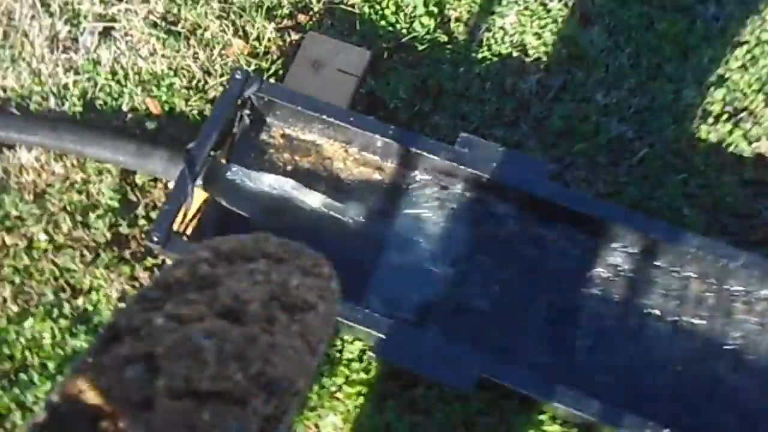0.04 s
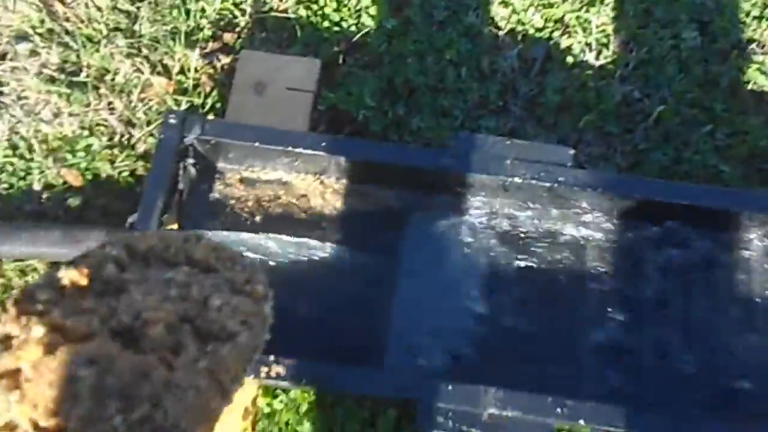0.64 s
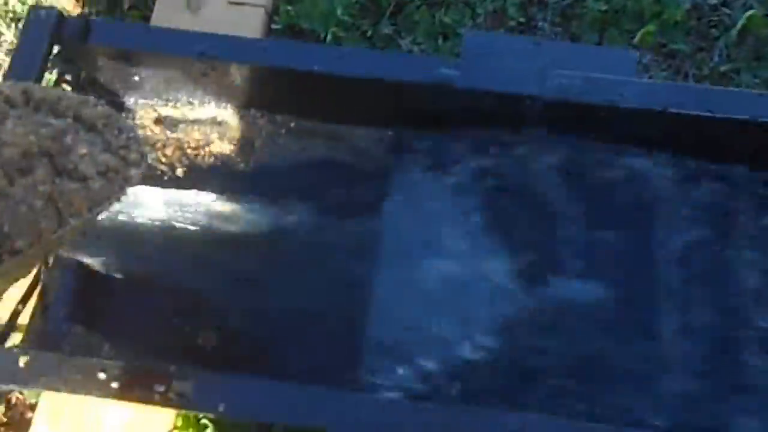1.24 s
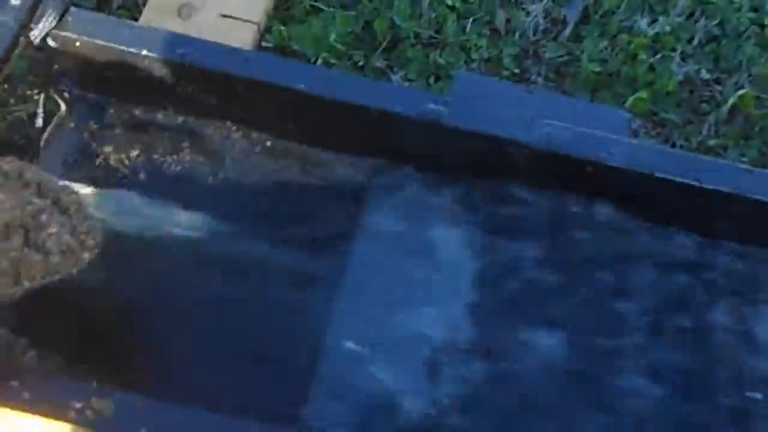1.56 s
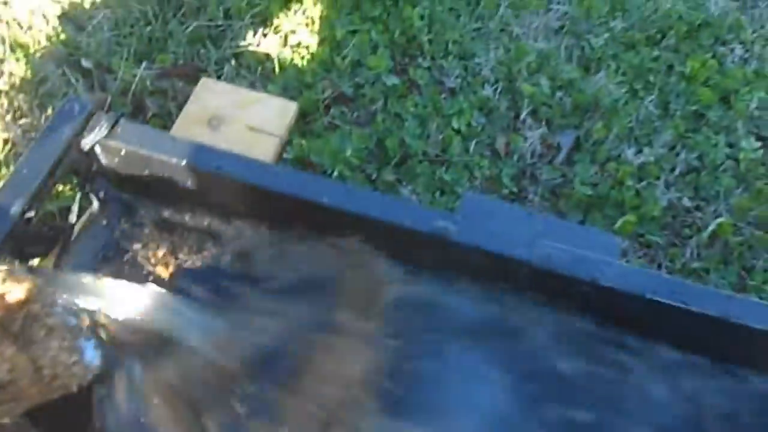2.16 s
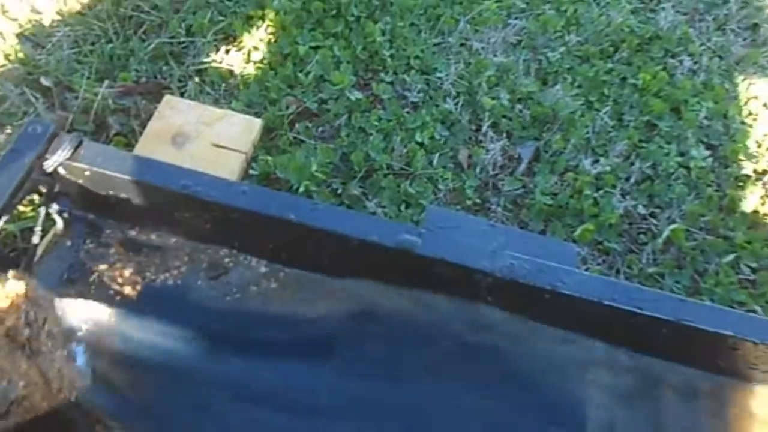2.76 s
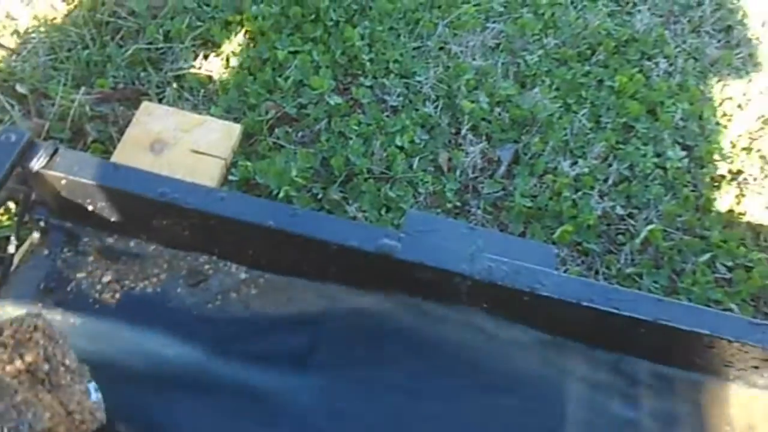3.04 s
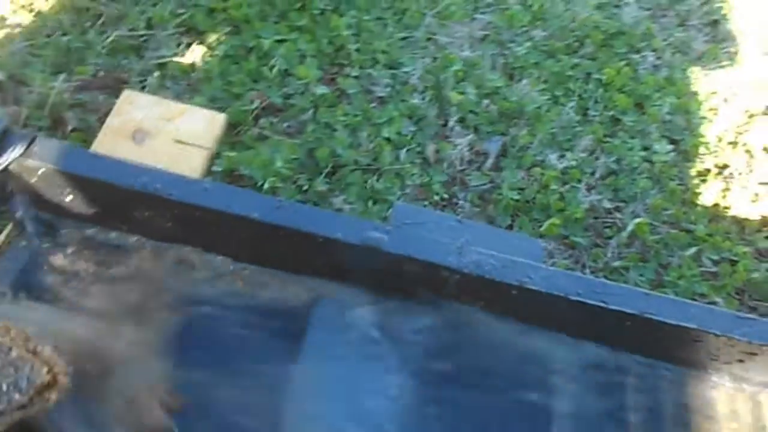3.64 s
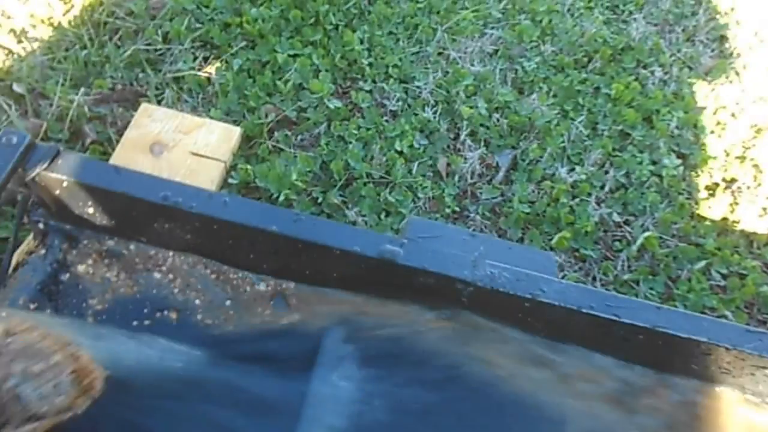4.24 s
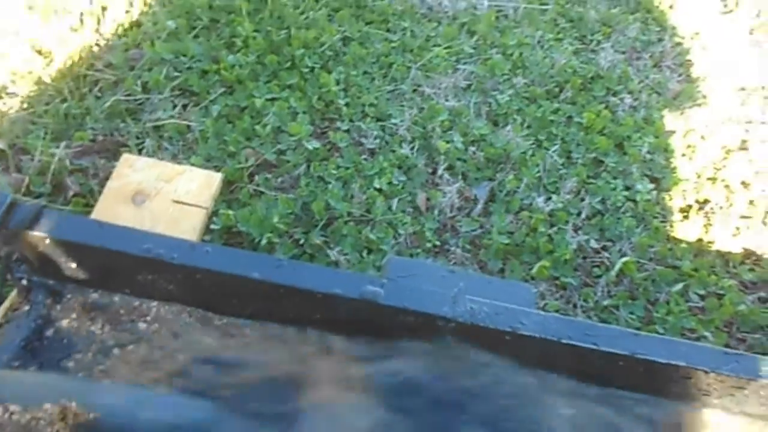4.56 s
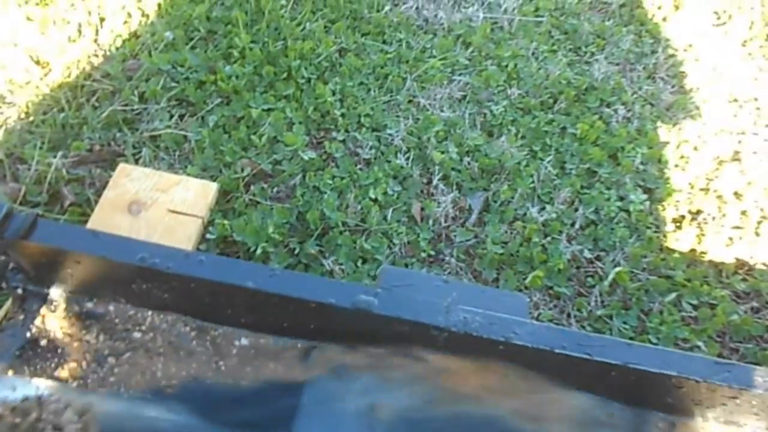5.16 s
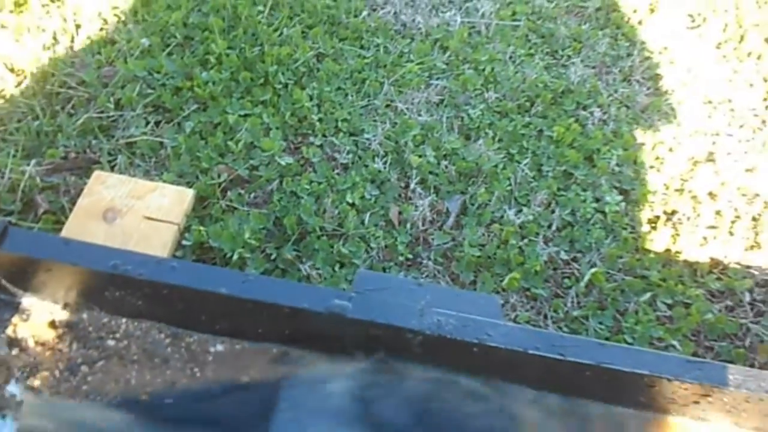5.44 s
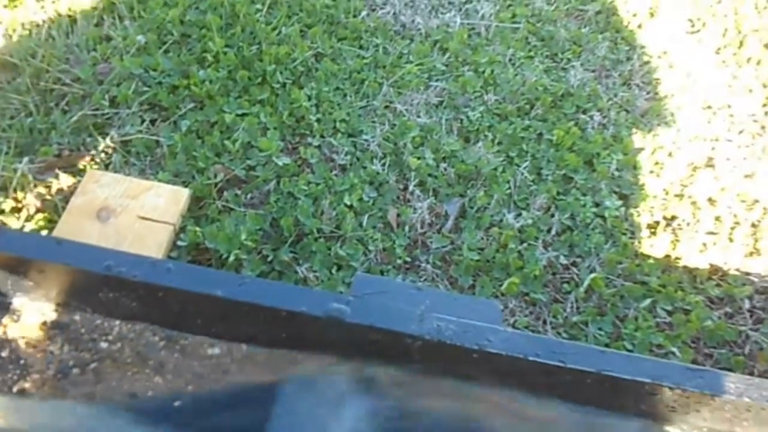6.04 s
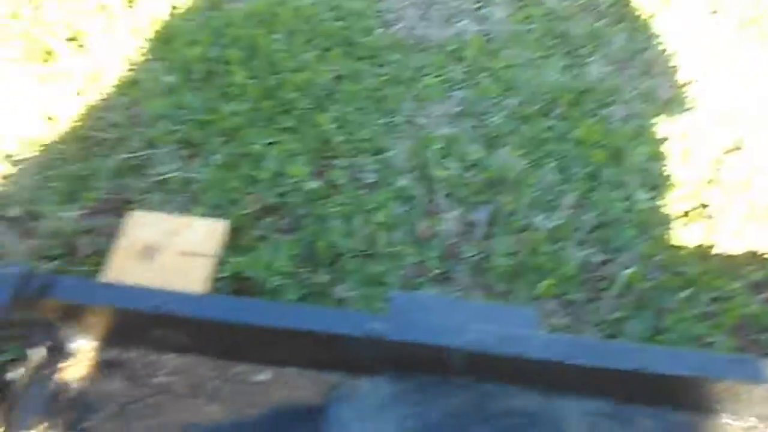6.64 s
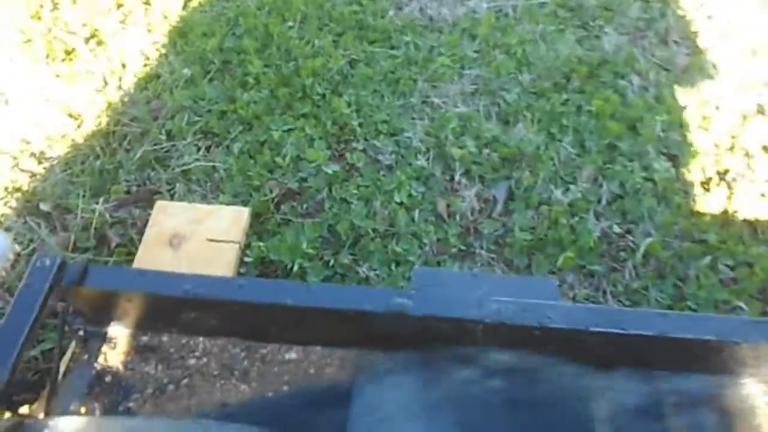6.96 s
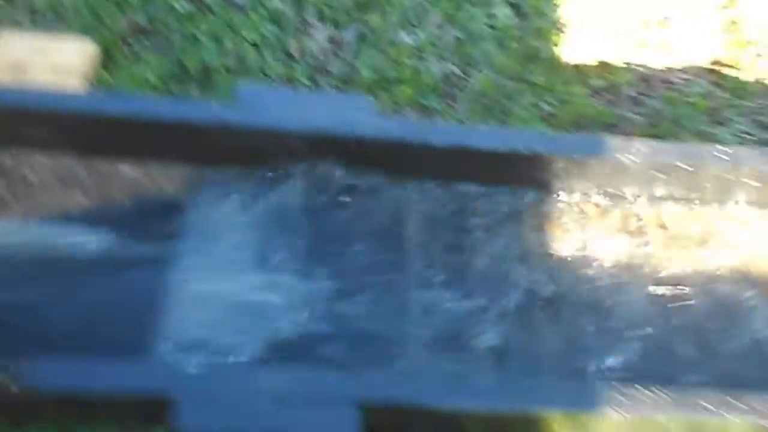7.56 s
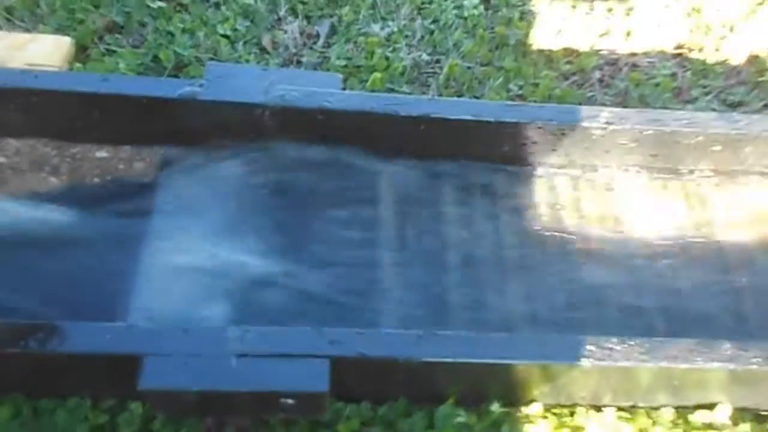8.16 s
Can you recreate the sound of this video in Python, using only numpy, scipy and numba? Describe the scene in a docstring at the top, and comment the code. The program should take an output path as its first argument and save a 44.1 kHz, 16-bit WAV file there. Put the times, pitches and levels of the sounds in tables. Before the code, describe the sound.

Close running water bubbles and crackles in a trough as wet gravel drops in, plopping, rattling and washing away.

```python
"""Hose jet in a sluice box

A hose jet runs down a sluice box on a lawn. Where it plunges it traps gulping pockets of air, sheds
rising bubbles and throws up a fine crackling spray. Clods of wet gravel drop off a scoop, choke the jet
for a while and are washed down the trough. A pump hums faintly and a breeze touches the microphone."""
import sys
import numpy as np
from scipy import signal
from scipy.fft import rfft, irfft
from scipy.io import wavfile
from scipy.ndimage import uniform_filter1d
from numba import njit

SR = 44100
rng = np.random.default_rng(int(sys.argv[2]) if len(sys.argv) > 2 else 0)


def master(y):
    """Save y as 16-bit WAV."""
    cut = np.clip(np.atleast_2d(y).T, -1, 1)
    pcm = np.round(cut * 32767)  # scale
    wavfile.write(sys.argv[1], SR, pcm.astype(np.int16))


N = 366471
TIME = np.arange(N) / SR

# large air pockets trapped by the jet: (time [s], level [dB], pitch [Hz])
AIR_POCKETS = [(.141, -2, 673), (.287, -5.5, 645), (.445, -6.5, 610), (.541, -6, 682), (.951, 1.5, 697),
               (1.62, -8, 638), (1.9, -7.5, 680), (1.929, -1.5, 653), (2.541, -9.5, 635),
               (5.129, -10.5, 687), (5.262, -9, 700), (5.295, -13.5, 680), (6.03, -6.5, 692),
               (6.375, -5, 686), (6.534, -4.5, 638), (6.689, -8.5, 660), (7.212, -4.5, 714),
               (7.656, -5, 640), (7.913, -11, 647)]
# bright tone of droplets and fine grit: (frequency [Hz], level [dB])
SPRAY_EQ = [(300, -33), (900, -6.5), (2200, -4.5), (4000, -11), (5800, -14), (7000, -9.5), (8500, -3),
            (10300, 7), (11000, 2.5), (13000, -12)]


def undb(db):
    """Decibels to gain."""
    return 10 ** (np.asarray(db) / 20)


def unit(x):
    """Scale to rms 1."""
    return x / np.sqrt(np.mean(x ** 2))


def wander(rate):
    """Smooth random drift, a new value every 1 / rate s; spread near 1."""
    hold = int(SR / rate)
    steps = np.repeat(rng.standard_normal(N // hold + 1), hold)
    return 1.39 * uniform_filter1d(uniform_filter1d(steps, hold), hold)[:N]


def colour(x, points, size=4096):
    """Minimum-phase EQ of unit power gain through (frequency [Hz], level [dB]) points."""
    hz, db = np.transpose(points)
    bins = np.maximum(np.arange(size // 2 + 1) * SR / size, 1)
    cepstrum = irfft(np.log(undb(np.interp(np.log(bins), np.log(hz), db))))
    cepstrum[1:size // 2] *= 2
    cepstrum[size // 2 + 1:] = 0
    response = irfft(np.exp(rfft(cepstrum)))
    return signal.fftconvolve(x, response / np.linalg.norm(response))[:N]


def patter(rate, spread_db):
    """Tiny impacts of random size, about `rate` a second; rms 1."""
    hits = rng.random(N) < rate / SR
    sizes = undb(spread_db * np.minimum(rng.exponential(size=N), 4))
    return unit(hits * sizes * rng.choice([-1, 1], N))


def bursts(rows, tail):
    """Envelope of splashes (time [s], level [dB], length [s]), each with a softer tail."""
    out = np.zeros(N + SR // 4)
    for start, db, length in rows:
        age = TIME[:SR // 4] / length
        first = int(start * SR)
        out[first:first + len(age)] += undb(db) * (np.exp(-age ** 4) + tail * np.exp(-age / 2))
    return out[:N]


def swells(rows, attack_s, release_s):
    """Envelope of events (time [s], length [s], level [dB]) that rise, hold and die away."""
    out = np.zeros(N)
    for start, length, db in rows:
        onset = np.clip((TIME - start) / attack_s, 0, 1)
        out += undb(db) * onset * np.exp(-np.maximum(TIME - start - length, 0) / release_s)
    return out


@njit
def bubbles(start, size, hz, life, rise, damping, swell):
    """Each bubble grows for `swell` cycles, rings down and climbs in pitch until it surfaces."""
    out = np.zeros(N)
    for k in range(len(start)):
        first, length, phase = int(start[k] * SR), int(life[k] * SR), 0.
        for i in range(min(length, N - first)):
            age = i / length
            phase += hz[k] * (1 + rise * (.3 * age + .7 * age ** 3)) / SR
            envelope = (1 - np.exp(-(phase / swell) ** 2)) * np.exp(-damping * age) * (1 - age ** 6)
            out[first + i] += size[k] * envelope * np.sin(2 * np.pi * phase)
    return out


def swarm(rate, centre_hz, octaves, cycles, rise, spread_db):
    """Random bubbles, `rate` a second, scattered round one pitch; rms 1."""
    when, pitch, span, heft = rng.random((int(rate * N / SR), 4)).T
    hz = centre_hz * 2 ** (octaves * np.arcsin(2 * pitch - 1) / (np.pi / 2))
    size = undb(-spread_db * np.log(np.maximum(heft, .02))) * np.sqrt(centre_hz / hz)
    life = cycles * (.5 + span) / hz
    return unit(bubbles(when * N / SR, size, hz, life, rise, damping=2.95, swell=0.72))


def flow(layer):
    """Fader for "froth" or "spray": the water drops at the first big clod and slowly recovers."""
    # strength of the running water: (time [s], froth level [dB], spray level [dB])
    water_levels = [(0, -40.5, -42), (.48, -37, -38), (.72, -44.5, -42), (1.0, -40.5, -41.5),
                    (1.35, -38, -39.5), (1.85, -35, -35), (2.02, -36.5, -40), (2.08, -45.5, -44),
                    (2.7, -42, -42), (3.2, -46, -45.5), (3.4, -47.5, -52.5), (3.62, -55, -48),
                    (3.95, -43, -43), (4.35, -45, -46.5), (5.3, -42, -40.5), (5.55, -44, -44),
                    (6.0, -40, -37.5), (6.8, -39, -40), (8.31, -40, -40)]
    times, froth_db, spray_db = np.transpose(water_levels)
    return undb(np.interp(TIME, times, {"froth": froth_db, "spray": spray_db}[layer]))


def jet_open():
    """1 while the jet plunges freely, 0 while wet gravel chokes it."""
    choked_s, cleared_s, fade_s = 2.603, 5.15, 0.085
    return np.clip(np.maximum(choked_s - TIME, TIME - cleared_s) / fade_s + 1, 0, 1)


def jet():
    """The plunging jet traps air pockets of nearly one size that gurgle and gulp, until choked."""
    gurgle = swarm(rate=190, centre_hz=677, octaves=0.21, cycles=17.7, rise=0.05, spread_db=4)
    start, db, hz = np.array(AIR_POCKETS).T.copy()
    life_s = np.full(len(start), 0.027)
    gulps = bubbles(start, undb(db), hz, life_s, rise=0.055, damping=5.8, swell=2.1)
    return gurgle * undb(8) * flow("froth") * jet_open() + gulps


def froth():
    """Bubbles chirp and ping in the churned water, over its dull slosh and a wash of tiny splashes."""
    # tones of the body of water and of the tiny splashes: (frequency [Hz], level [dB])
    slosh_eq = [(60, -31), (170, -12.5), (255, -7.5), (320, -15), (450, 6), (560, -0.5), (800, -1),
                (1200, -10.5), (1700, -51), (4000, -16)]
    wash_eq = [(500, -27), (1400, -5), (2500, 1), (4000, -4.5), (7000, -30)]
    large = swarm(rate=230, centre_hz=1089, octaves=0.52, cycles=13.9, rise=0.32, spread_db=3.5)
    small = swarm(rate=520, centre_hz=2218, octaves=0.828, cycles=16.1, rise=0.49, spread_db=5)
    pings = swarm(rate=70, centre_hz=2686, octaves=0.703, cycles=25.5, rise=0.545, spread_db=0.5)
    slosh = colour(patter(rate=970, spread_db=3.5), slosh_eq)
    wash = colour(patter(rate=3000, spread_db=3.5), wash_eq)
    churn = undb(1.36 * wander(45) + 0.44 * wander(12))  # the surface heaves, so bubbles bunch
    duck = undb(-6 + 4 * jet_open())  # a blocked jet churns in less air
    chirps = (undb(-1) * large + undb(-4) * small + undb(-4) * pings) * duck
    return undb(2) * flow("froth") * churn * (chirps + undb(-2.5) * slosh + undb(-8.5) * wash)


def spray():
    """Droplets crackle in quick flurries and the tiniest bubbles fizz; a few drops hit the box hard."""
    # sharp drops and grit striking the box: (time [s], level [dB])
    strikes = [(0.591, 3), (1.181, 1.5), (1.74, 1.5), (4.017, -2), (4.504, -0.5), (5.369, 2),
               (6.4593, -0.5), (6.8953, 0.5), (7.9158, -1)]
    crackle = patter(rate=2000, spread_db=5) + undb(-8) * rng.standard_normal(N)
    fizz = swarm(rate=1200, centre_hz=6404, octaves=0.94, cycles=23, rise=0.56, spread_db=4)
    heavy_drops = patter(rate=60, spread_db=2.5)
    flurries = undb(1.42 * wander(110) + 1.24 * wander(30))
    mist = unit(colour((crackle + undb(2) * fizz + undb(0.5) * heavy_drops) * flurries, SPRAY_EQ))
    ticks = np.zeros(N)
    for start, db in strikes:
        ticks[int(start * SR)] += undb(db)
    return undb(5) * flow("spray") * mist + colour(ticks, SPRAY_EQ)


def pump():
    """A faint pump hum, each harmonic wavering in level and pitch."""
    # partials of the hum: (frequency [Hz], relative level [dB])
    harmonics = [(86, -63), (172, -67), (258, -62)]
    hum = np.zeros(N)
    for hz, db in harmonics:
        rms = undb(db - 3 + 0.45 * wander(7.8))
        phase = np.cumsum(hz * (1 + 0.0052 * wander(6.1))) / SR
        hum += rms * np.sqrt(2) * np.sin(2 * np.pi * phase)
    return hum


def breeze():
    """A bed of still air, and a light breeze that flutters and gusts on the microphone."""
    # tones of the open air and of the wind rumble: (frequency [Hz], level [dB])
    air_eq = [(20, -14.5), (85, -2.5), (130, -0.5), (200, -10.5), (500, -1), (1500, -20.5), (10000, -42)]
    rumble_eq = [(15, -14), (50, -12.5), (90, -17.5), (200, -29), (1000, -83)]
    # gusts on the microphone: (time [s], length [s], level [dB])
    gusts = [(.3, .4, -58), (1.96, .08, -48), (6.3, 0.33, -51), (6.98, 0.62, -57.5), (8.14, 0.078, -51)]
    air = undb(-51.5) * colour(rng.standard_normal(N), air_eq)
    wind = undb(-65) + swells(gusts, attack_s=0.099, release_s=0.027)
    flutter = undb(1.8 * wander(14))
    return air + wind * flutter * colour(rng.standard_normal(N), rumble_eq)


def bloops():
    """Large single bubbles sing upward, jostled by the current; fainter strays come at random."""
    # large rising bubbles: (time [s], level [dB], starting pitch [Hz])
    big_bubbles = [(0.114, -15.5, 920), (0.467, -11, 970), (0.502, -13.5, 888), (.931, -16.5, 987),
                   (1.352, -16.5, 940), (1.418, -15, 1610), (2.624, -16, 1103), (2.768, -21, 974),
                   (2.835, -41, 1980), (3.036, -21, 1260), (3.185, -24, 1720), (3.219, -19.5, 1120),
                   (3.364, -18.5, 728), (3.701, -20.5, 720), (3.737, -20.5, 940), (4.218, -20, 1180),
                   (4.442, -22, 1015), (4.632, -17.5, 878), (6.485, -7, 813), (6.604, -16, 1920),
                   (6.704, -9, 998), (6.756, -12, 916), (6.893, -9.5, 848), (7.12, -17.5, 2080),
                   (7.793, -16.5, 1154)]
    start, db, hz = np.array(big_bubbles).T.copy()
    loud = bubbles(start, undb(db), hz, 29 / hz, rise=.8, damping=3.6, swell=1.7)
    strays = swarm(rate=11, centre_hz=1359, octaves=0.716, cycles=24.4, rise=.6, spread_db=2.7)
    jostle = undb(1.5 * wander(300))
    return (loud + undb(-4) * flow("froth") * strays) * jostle


def slaps():
    """Water folds onto itself in a short burst of droplets, alone or as it closes over a gulp."""
    # water folding over: (time [s], level [dB])
    folds = [(0.502, -31), (2.199, -25.5), (2.558, -24.5), (2.83, -32.5), (4.217, -26.5), (5.1, -27),
             (5.432, -24), (6.611, -25.5), (6.901, -25.5), (7.119, -28), (7.916, -27)]
    # tone of a wet slap: (frequency [Hz], level [dB])
    slap_eq = [(250, -16), (700, 2.5), (1300, -1), (2400, -3.5), (4000, -14), (7000, -17), (11000, -6)]
    closings = [(start, db - 24) for start, db, _ in AIR_POCKETS]
    envelope = bursts([(start, db, 0.0067) for start, db in folds + closings], tail=0.73)
    return envelope * colour(patter(rate=9200, spread_db=1), slap_eq)


def clods():
    """Each clod scatters grit, opens a cavity that plops, thuds on the trough and trails bubbles."""
    # clods hitting the water: (time [s], plop level [dB], cavity pitch [Hz], plop length [s],
    # spatter level [dB], spatter length [s], thud level [dB])
    landings = [(1.02, -1.5, 208, 0.015, -36, 0.014, -21.5), (2.017, 1, 480, 0.015, -19.5, 0.028, -23),
                (2.047, -4, 480, .016, -17.5, 0.0027, -44), (2.233, -5.5, 433, 0.015, -24.5, 0.012, -34),
                (3.109, -33, 507, .025, -24.5, 0.014, -35), (3.119, -11, 501, 0.038, -18.5, 0.019, -42),
                (3.156, -26, 483, 0.11, -24.5, .0035, -34), (3.27, -7.5, 489, 0.041, -17.5, 0.019, -33.5),
                (3.297, -17, 498, 0.04, -20, .0027, -44), (3.359, -23, 440, 0.029, -27.5, 0.005, -32),
                (3.457, -28.5, 287, 0.043, -43, 0.0099, -43), (3.586, -23.5, 485, 0.036, -27, 0.0028, -42),
                (3.615, -24, 313, 0.058, -28.5, 0.015, -31.5), (3.768, -7, 363, 0.024, -14, 0.0098, -26),
                (4.276, -24, 487, .039, -28, 0.004, -40), (4.628, -14, 387, 0.02, -25.5, .017, -33.5),
                (4.854, -16.5, 369, .036, -28, 0.015, -24.5), (4.895, -18, 365, 0.047, -24.5, 0.021, -38),
                (5.322, -8, 440, 0.023, -24, 0.0059, -26)]
    # tones of the spatter and of the thud on the trough floor: (frequency [Hz], level [dB])
    spatter_eq = [(120, -11), (300, 4.5), (900, 3), (1600, -2.5), (3200, -4.5), (5500, -6.5), (7500, -2),
                  (9600, 7.5), (11000, 6), (13000, -2)]
    thud_eq = [(50, -21), (110, -16), (160, 4.5), (200, -8), (265, 6), (400, 4), (600, -1.5), (1100, 0.5),
               (2000, -30.5), (5000, -24)]
    start, plop_db, hz, plop_s, spatter_db, spatter_s, thud_db = np.array(landings).T.copy()
    plops = bubbles(start, undb(plop_db), hz, plop_s, rise=0.053, damping=4.06, swell=1.45)
    grit = bursts(zip(start, spatter_db, spatter_s), tail=0.071) * patter(rate=9000, spread_db=6.5)
    blows = bursts([(at, db, .011) for at, db in zip(start, thud_db)], tail=0.52)
    thuds = blows * patter(rate=6000, spread_db=-2)
    trails = [(at, 0, db - 15) for at, db in zip(start, spatter_db)]
    wake = swarm(rate=260, centre_hz=626, octaves=0.82, cycles=11, rise=0.26, spread_db=6)
    wake *= swells(trails, attack_s=0.0078, release_s=0.039)
    return plops + colour(grit, spatter_eq) + colour(thuds, thud_eq) + wake


def gravel():
    """Stones tumble down the trough in surges, rattle its floor and churn up bubbles; grit clicks."""
    # resonances of the water-laden trough: (frequency [Hz], width [Hz], level [dB])
    trough_modes = [(163, 15, -5.5), (253, 75, 0), (328, 166, -2), (505, 45, 3), (732, 230, 1),
                    (854, 117, 6), (1320, 590, -10)]
    # heaps of gravel slumping into the stream: (time [s], length [s], level [dB])
    slumps = [(3.59, 0.066, -37), (3.86, .16, -35), (4.07, 0.092, -31.5), (4.27, .06, -42),
              (4.48, 0.096, -32.5), (4.61, 0.14, -31.5), (4.85, .13, -33), (5.06, 0.13, -38.5),
              (5.335, 0.06, -32.5)]
    surges = undb(2 * wander(60))
    knocks = patter(rate=400, spread_db=4.5) * surges
    stones = unit(sum((-1) ** k * undb(db) * signal.lfilter(*signal.iirpeak(hz, hz / width, SR), knocks)
                      for k, (hz, width, db) in enumerate(trough_modes)))
    glugs = swarm(rate=120, centre_hz=612, octaves=1.027, cycles=21.4, rise=0.11, spread_db=3)
    clicks = swarm(rate=90, centre_hz=7170, octaves=0.7, cycles=7, rise=0, spread_db=3.5)
    grit = unit(colour(clicks * surges, SPRAY_EQ))
    tumble = undb(-2) * stones + undb(-3.5) * glugs + undb(-10.5) * grit
    return swells(slumps, attack_s=0.0061, release_s=0.047) * tumble


def scene():
    """A mono mix, close and in the open air, so nothing echoes."""
    water = jet() + froth() + bloops() + slaps() + spray()
    return (water + clods() + gravel() + pump() + breeze())[None]


def record(dry):
    """The microphone has a broad hollow in the treble and a steep roll-off on top."""
    hollow_hz, top_hz = 5512, 10600
    scooped = signal.lfilter(*signal.iirnotch(hollow_hz, 1.3, SR), dry)
    return signal.sosfilt(signal.ellip(9, .3, 65, top_hz, fs=SR, output="sos"), scooped)


dry = scene()
out = record(dry)
master(out)
```